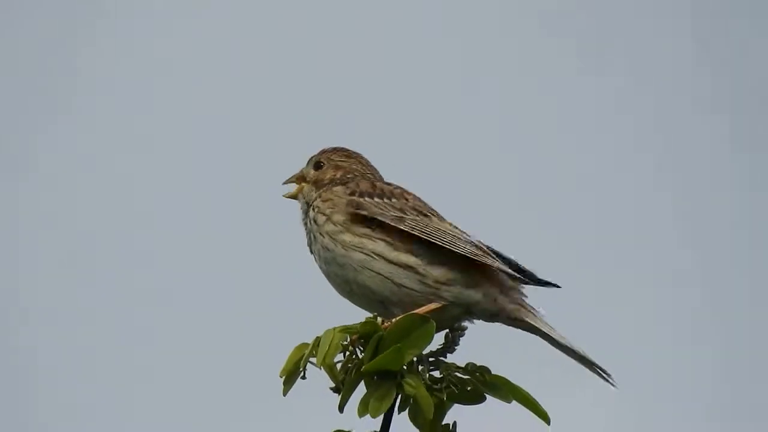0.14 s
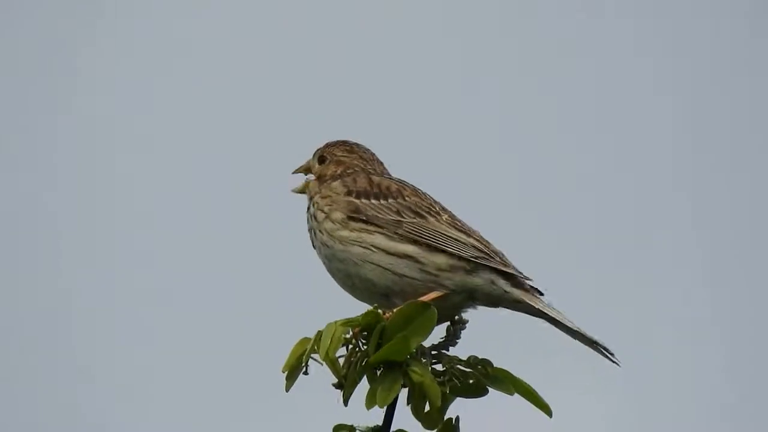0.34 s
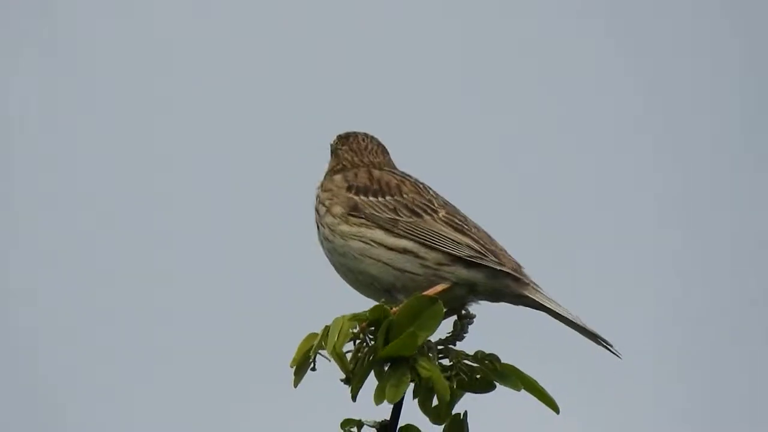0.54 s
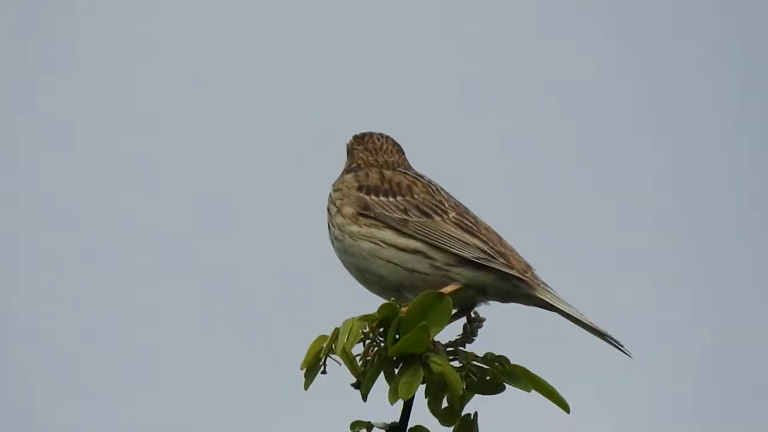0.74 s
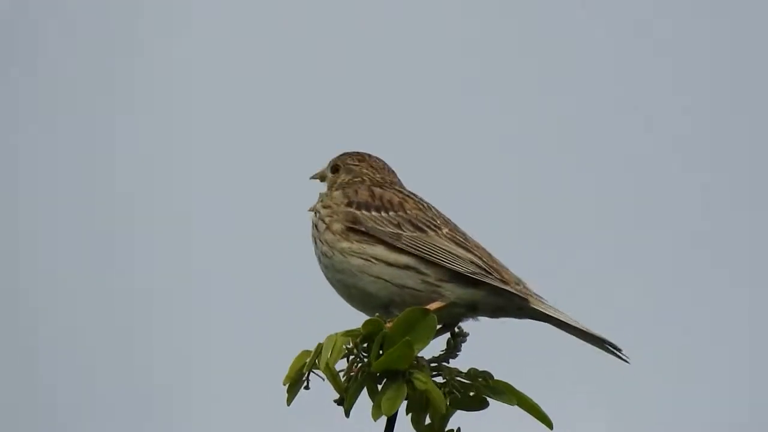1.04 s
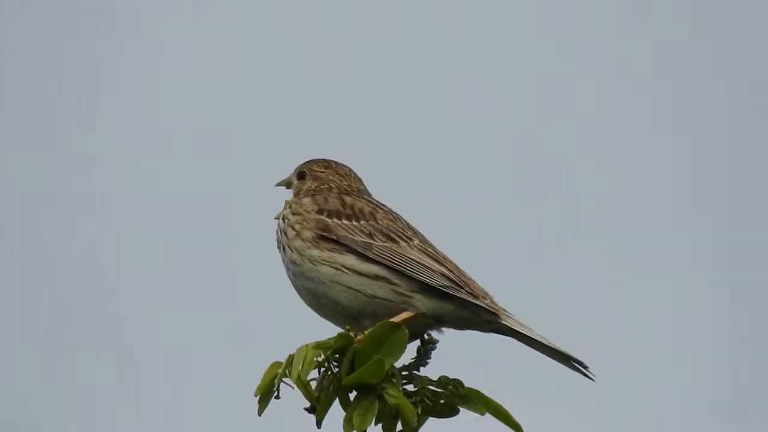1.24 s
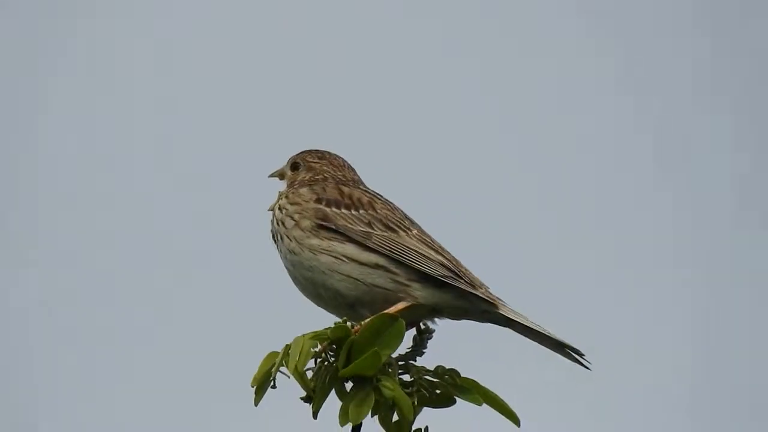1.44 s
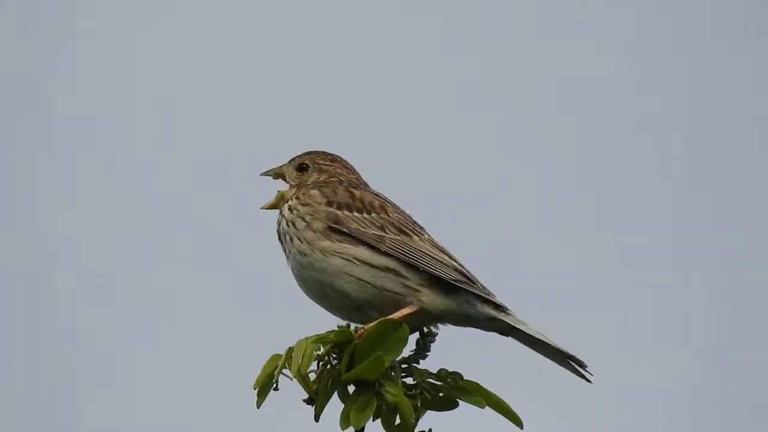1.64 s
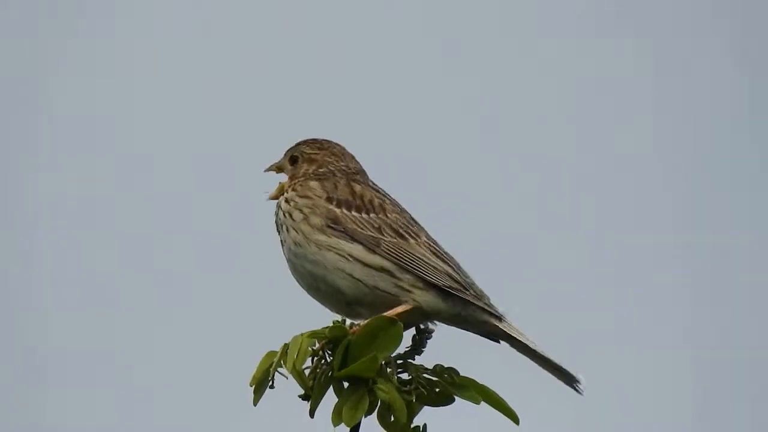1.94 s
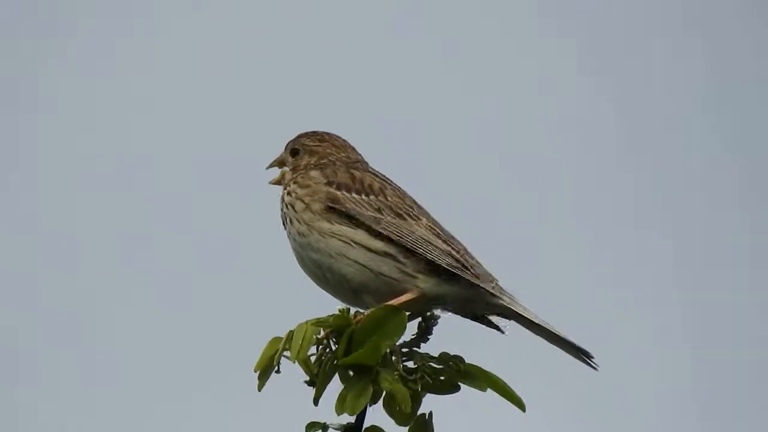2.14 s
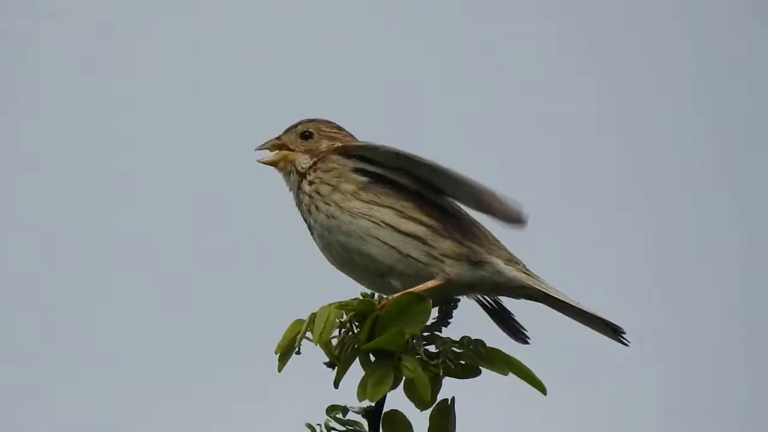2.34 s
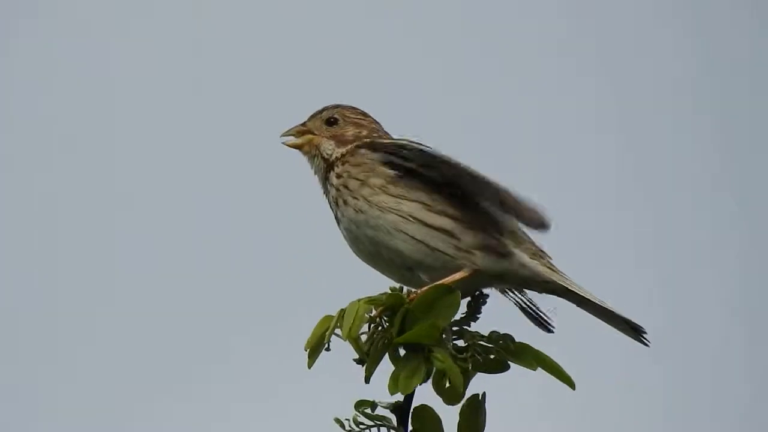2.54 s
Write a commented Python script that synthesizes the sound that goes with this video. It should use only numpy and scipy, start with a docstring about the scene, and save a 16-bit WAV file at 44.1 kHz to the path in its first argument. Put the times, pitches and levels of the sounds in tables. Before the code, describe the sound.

A small songbird's quickening ticks tumble into a high jangle over soft outdoor hush.

```python
"""A small bird sings from a treetop: quickening ticks, a jangle of falling whistles, a slowing rattle.
Each note is a short gliding near-sine. Two microphone ports hear the singer with a balance that
changes with pitch, and leaves and ground throw a short echo back. Other birds twitter far away
over a faint outdoor wash, a few soft low tones and a little wind rumble on the microphone."""
import sys
import numpy as np
from scipy import signal
from scipy.fft import rfft, irfft
from scipy.io import wavfile
from scipy.ndimage import uniform_filter1d

SR = 44100
rng = np.random.default_rng(int(sys.argv[2]) if len(sys.argv) > 2 else 0)


def store_wav(level_fs):
    """Save 16-bit WAV to argv[1]."""
    pcm = np.round(np.clip(np.atleast_2d(level_fs), -1, 1) * 32767)
    wavfile.write(sys.argv[1], SR, pcm.T.astype(np.int16))


N = 119070

# Opening ticks, before their delay and trim: cue_s, level_db, tail_hz, tail_relative_db, pip_relative_db
OPENING_TICKS = [(0.2214, -13, 4667, -7.5, -40), (0.4294, -11.5, 4710, -5.5, -35.5),
                 (0.6043, -9.5, 4747, -7, -9), (0.7428, -11.5, 4735, -4, -7.5),
                 (0.8514, -10.5, 4905, -5, -10.5), (0.9376, -9.5, 4980, -5.5, -6),
                 (1.0118, -10, 4850, -6, -4.5), (1.077, -8.5, 4830, -10, -8)]
# Low fluttering notes inside the jangle: start_s, length_s, pitch_hz, level_db
FLUTTER_NOTES = [(1.187, 0.036, 4540, -33), (1.222, 0.023, 4320, -30), (1.247, 0.065, 4836, -27.5),
                 (1.462, .008, 4190, -41), (1.48, .01, 4190, -30.5)]
# Whistles of the jangle and rattle: peak_s, level_db, rise_s, fall_s, start_hz, peak_hz, end_hz
SONG_WHISTLES = [(0.033, -38.5, 0.006, 0.0075, 7180, 6800, 6100),
                 (1.11, -27, 0.0033, 0.0013, 5450, 5230, 5050),
                 (1.12, -15.5, 0.006, 0.004, 5730, 5770, 4970),
                 (1.1312, -23, 0.0077, 0.0108, 7850, 6980, 6850),
                 (1.1436, -31.5, 0.0048, 0.0016, 5910, 5440, 4900),
                 (1.157, -25.5, 0.0033, 0.0027, 5640, 5300, 5110.0),
                 (1.165, -32, 0.022, 0.004, 7250, 7120, 7300),
                 (1.167, -25, 0.0044, 0.0032, 5530, 5060, 4910.0),
                 (1.1781, -19, 0.0027, 0.0017, 7260, 5350, 4740),
                 (1.1903, -24, 0.003, 0.002, 7280, 6170, 4810.0),
                 (1.2015, -21, 0.0067, 0.0016, 7320, 7150, 6740),
                 (1.2048, -15.5, 0.0033, 0.0011, 6890, 5400, 4960),
                 (1.2106, -17.5, 0.0072, 0.0018, 7380, 6770, 6700),
                 (1.214, -10, 0.0033, 0.0024, 6820, 5800, 4960),
                 (1.23, -21.5, 0.0066, 0.0027, 5010.0, 5700, 5660),
                 (1.2368, -23, 0.0033, 0.002, 5090, 5440, 5530),
                 (1.2466, -11, 0.0049, 0.0045, 7650, 5960, 5020),
                 (1.2966, -27.5, 0.014, 0.0045, 8040, 7100, 7200),
                 (1.3053, -11, 0.0049, 0.0016, 5090, 5740, 5900),
                 (1.3061, -15, 0.0044, 0.0045, 6820, 6830, 7030),
                 (1.3151, -30, 0.0036, 0.0054, 7010, 6800, 7070),
                 (1.3158, -35.5, 0.0033, 0.0031, 5320, 5540, 5410),
                 (1.3214, -21.5, 0.0036, 0.0034, 6090, 5470, 5130),
                 (1.3273, -13, 0.0027, 0.0023, 6400, 5610, 4960),
                 (1.3326, -24, 0.0019, 0.0016, 7400, 6340, 5400),
                 (1.3372, -13.5, 0.0083, 0.0067, 7125, 5850, 5000),
                 (1.3545, -15.5, 0.0099, 0.0036, 5700, 5600, 5130),
                 (1.3688, -26, 0.0055, 0.0032, 8210, 7360, 7080),
                 (1.3719, -11.5, 0.0023, 0.0022, 7100, 6330, 5040),
                 (1.4259, -11.2, 0.0074, 0.003, 6270, 5820, 5140),
                 (1.4353, -29, 0.0033, 0.0022, 6320, 5830, 5160),
                 (1.4456, -23, 0.012, 0.0039, 5520, 5700, 5230),
                 (1.4466, -26.5, 0.003, 0.0018, 6530, 7060, 7930),
                 (1.4544, -26.5, 0.003, 0.0023, 6810.0, 6850, 7650),
                 (1.4563, -16.5, 0.0033, 0.0029, 5940, 5560, 5380),
                 (1.4673, -23, 0.0055, 0.0036, 5350, 5180, 5110.0),
                 (1.4766, -15.5, 0.01, 0.0043, 7610.0, 5820, 5100),
                 (1.4841, -33.5, 0.0024, 0.0016, 7720, 7630, 7900),
                 (1.4928, -12.5, 0.0064, 0.004, 6650, 5780, 4980),
                 (1.4997, -23, 0.0033, 0.0033, 7200, 6810.0, 6460),
                 (1.5077, -12, 0.0072, 0.0045, 6025, 5830, 5140),
                 (1.5177, -25.5, 0.0025, 0.0037, 7400, 6870, 6660),
                 (1.5264, -10.5, 0.0065, 0.0031, 5910.0, 5840, 4900),
                 (1.5335, -22, 0.0033, 0.0024, 7700, 6980, 6530),
                 (1.5422, -10.5, 0.0078, 0.0045, 6300, 5825, 4930),
                 (1.551, -29.5, 0.0018, 0.0031, 7710.0, 7420, 6810.0),
                 (1.5636, -14.5, 0.0121, 0.0049, 5910.0, 5760, 5130),
                 (1.57, -22.5, 0.0066, 0.0042, 7880, 6850, 6510.0),
                 (1.5829, -11, 0.0096, 0.0025, 5700, 5900, 4820),
                 (1.5915, -19, 0.0038, 0.0074, 7820, 6790, 6840),
                 (1.6072, -9.5, 0.011, 0.0043, 5750, 5645, 5490),
                 (1.62, -28, 0.0055, 0.0036, 5590, 5530, 5510.0),
                 (1.6239, -31.5, 0.019, 0.0045, 7110.0, 7020, 7070),
                 (1.6506, -11.5, 0.0083, 0.0048, 6010, 5800, 5400),
                 (1.663, -33, 0.0055, 0.0028, 5800, 5590, 5500),
                 (1.681, -18, 0.0088, 0.0045, 7670, 6790, 7100),
                 (1.7128, -10, 0.011, 0.0045, 7750, 6570, 5880),
                 (1.7441, -10, 0.011, 0.0081, 7730, 6540, 5870),
                 (1.7781, -11, 0.011, 0.012, 8100, 6600.0, 5700),
                 (1.815, -11.5, 0.016, 0.0072, 6150, 5630.0, 5840),
                 (1.8379, -19, 0.019, 0.0086, 4800, 5146, 5230),
                 (1.8808, -9.5, 0.0086, 0.0045, 7900, 6510, 5800),
                 (1.9232, -9.5, 0.0074, 0.0045, 7790, 6560, 5810.0),
                 (1.9668, -11, 0.013, 0.0085, 7910.0, 6370, 5950),
                 (2.0124, -11, 0.0099, 0.0042, 7740, 6510, 6090),
                 (2.0623, -15, 0.0063, 0.0034, 7680, 6490, 6150),
                 (2.1148, -19, 0.0064, 0.0054, 7520, 6540, 6230),
                 (2.1753, -19, 0.006, 0.0081, 5870, 5577, 5610.0),
                 (2.264, -19.5, 0.0042, 0.0054, 7290, 6540, 6190),
                 (2.3171, -18, 0.0066, 0.0028, 7720, 6680, 6430),
                 (2.3725, -21.5, 0.0022, 0.0018, 6650, 6270, 5480),
                 (2.3746, -22.5, 0.0078, 0.0028, 7740, 6820, 6900),
                 (2.4361, -23, 0.011, 0.0035, 8240, 6480, 5120),
                 (2.4387, -18.5, 0.0027, 0.0033, 7030, 6700, 6490),
                 (2.4927, -19, 0.0055, 0.0017, 7850, 6390, 5380)]
# The singer's balance between the ports: frequency_hz, left_minus_right_db
PORT_BALANCE = [(4300, 3), (5200, 4.5), (5700, 4), (6200, -0.5), (6650, -3), (7200, -10), (7600, 2),
                (8000, 3), (8800, -1.5)]
# The singer's phase between the ports: frequency_hz, left_minus_right_rad
PORT_PHASE_SHIFT = [(4300, -0.51), (5200, -0.75), (5800, -.6), (6700, -0.84), (8000, -0.91)]
# Reflections off nearby leaves: delay_s, left_db, right_db
LEAF_BOUNCES = [(.0024, -12.5, -13), (.0062, -17.5, -23.5), (0.0105, -14.5, -20.5)]
# Calls of distant birds: peak_s, level_db, rise_s, fall_s, start_hz, peak_hz, end_hz
FAR_WHISTLES = [(0.03, -51, 0.0198, 0.0132, 3610.0, 4210.0, 4400),
                (0.076, -54, 0.022, 0.0094, 3710.0, 4200, 4310.0),
                (0.1112, -54.4, 0.0154, 0.0079, 3700, 4030, 4300),
                (0.124, -52, 0.0088, 0.011, 4650, 4440, 4310.0),
                (0.1642, -50.5, 0.0088, 0.016, 4590, 4630, 4040),
                (0.2136, -45, 0.0074, 0.04, 4630, 4530, 4190),
                (0.0789, -57, 0.033, 0.016, 3410.0, 3520.0, 3530),
                (0.1998, -58.5, 0.04, 0.034, 3110.0, 3050.0, 3110.0),
                (0.4077, -46.5, 0.077, 0.0308, 4600, 4850, 4740),
                (0.529, -56, 0.041, 0.086, 2610.0, 2690, 2820),
                (0.7006, -46.5, 0.005, 0.014, 4570, 4720, 4160),
                (0.8645, -31.5, 0.017, 0.02, 4810.0, 4280, 4490),
                (0.9794, -48.5, 0.021, 0.02, 3910.0, 3990, 3770),
                (1.1021, -39.5, 0.044, 0.035, 3880, 3724, 3640),
                (1.103, -65.5, 0.026, 0.04, 3210.0, 2740.0, 2200),
                (1.1575, -47.5, 0.0165, 0.04, 3870, 3560, 3280),
                (1.2526, -56, 0.025, 0.027, 3360, 3340, 3340),
                (1.351, -43.5, 0.03, 0.022, 3810.0, 3667, 3560),
                (1.3643, -44.5, 0.023, 0.019, 3310.0, 3347, 3200),
                (1.4617, -35, 0.0275, 0.033, 4046, 4320, 4190),
                (1.5603, -39, 0.013, 0.011, 3550, 3514, 3120),
                (1.6035, -43, 0.011, 0.0083, 3510.0, 3646, 3390),
                (1.66, -40.5, 0.011, 0.012, 4610.0, 4450, 4070),
                (1.6951, -44, 0.023, 0.014, 3210.0, 3523, 3110.0),
                (1.7895, -47, 0.012, 0.016, 4610.0, 4540, 4260),
                (1.953, -38.5, 0.023, 0.0069, 4700, 4670, 4870),
                (1.9681, -40, 0.011, 0.0088, 5210.0, 5260, 5230),
                (1.982, -49, 0.0089, 0.0074, 4530, 4660, 4210.0),
                (2.006, -56.5, 0.012, 0.022, 3710.0, 3760.0, 3460),
                (2.027, -51, 0.013, 0.0132, 4740, 4740, 4310.0),
                (2.0614, -47, 0.014, 0.015, 4830, 4550.0, 4250),
                (2.1148, -45.5, 0.076, 0.0071, 3130, 3520, 3470),
                (2.109, -48, 0.0132, 0.01, 4620, 4500, 4300), (2.135, -58, 0.0165, 0.015, 2960, 3000, 3030),
                (2.148, -45.5, 0.0079, 0.013, 4840, 4600, 4110.0),
                (2.1622, -55, 0.022, 0.018, 3910.0, 3710.0, 3500),
                (2.1938, -44.5, 0.0132, 0.012, 4750, 4570, 4260),
                (2.224, -50.5, 0.034, 0.036, 3410.0, 3130.0, 2720),
                (2.3014, -53.5, 0.0132, 0.0198, 4810.0, 4810.0, 4540),
                (2.3783, -53, 0.011, 0.0063, 4540, 4450.0, 4280),
                (2.4144, -46.5, 0.0076, 0.017, 4830, 4520, 4260),
                (2.471, -46.5, 0.011, 0.0067, 4710.0, 4400, 4210.0),
                (2.5104, -45.5, 0.014, 0.008, 4590, 4540, 4050),
                (2.5079, -65, 0.045, 0.022, 2610.0, 2720.0, 2700),
                (2.5488, -44, 0.014, 0.018, 4310.0, 4660.0, 4240),
                (2.5678, -57, 0.041, 0.046, 2310.0, 2344, 2100),
                (2.5982, -44.5, 0.015, 0.013, 4210.0, 4680, 4210.0),
                (2.628, -62, 0.0055, 0.004, 4210.0, 4540, 4670),
                (2.6486, -52, 0.007, 0.0055, 4170, 4470, 4560),
                (2.6584, -59.3, 0.0198, 0.016, 2810.0, 2740.0, 2660),
                (2.671, -48, 0.0055, 0.004, 4200, 4450, 4530),
                (2.6925, -46.5, 0.0061, 0.0048, 4250, 4540, 4560)]
# Faint low tones from far off: peak_s, level_db, rise_s, fall_s, start_hz, peak_hz, end_hz
FAR_LOW_TONES = [(.335, -53.5, 0.035, 0.038, 900, 925, 1100), (1.82, -54.5, .05, 0.034, 560, 500, 495),
                 (0.62, -57, .04, .03, 500, 555, 570)]
# Tone colour of the outdoor wash: frequency_hz, relative_db
WASH_SPECTRUM = [(20, -31), (45, -14), (85, -18), (120, -1.5), (170, 2.5), (357, -4), (635, -3.5),
                 (1050, -3.5), (1500, -6.5), (2400, -15), (3230, -10), (4480, -7), (5400, -17),
                 (7970, -18.5), (9500, -25.5), (12500, -28), (14800, -31.5), (15800, -37)]
# How alike the wash is on both sides: frequency_hz, correlation
WASH_LIKENESS = [(60, 0.34), (160, 0.53), (410, 0.54), (1090, 0.72), (2860, 0.41), (7520, 0.21)]
# Which way the wash leans: frequency_hz, left_minus_right_db
WASH_PAN = [(60, 0.63), (160, 0.5), (410, 1.0), (1090, 0.0), (2860, 3.9), (7520, 2.1)]
# Fader moves of the wind rumble, before its trim: time_s, level_db
WIND_GUSTS = [(0.0, -68), (0.01, -78), (0.71, -65), (0.77, -77), (0.8, -56), (1.35, -78), (1.38, -36),
              (2.15, -70.5), (2.63, -65), (2.7, -62)]


def singer():
    """The near bird's song: ticks, fluttering low notes, whistles and a short buzz."""
    song = np.zeros(N)
    add_ticks(song)
    for row in FLUTTER_NOTES:
        add(song, *flutter_note(*row))
    for row in SONG_WHISTLES:
        add(song, *whistle(*row))
    add_buzz(song)
    return song


def add_ticks(song, delay_s=0.0029, trim_db=-6):
    """Each tick is a fast falling chirp with a tiny lead-in pip and a low fluttering tail."""
    pip_s, pip_hz = 0.0017, 5950
    for cue_s, level_db, tail_hz, tail_db, pip_db in OPENING_TICKS:
        peak_s, db = cue_s + delay_s, level_db + trim_db
        add(song, *whistle(peak_s, db, rise_s=0.0028, fall_s=0.0039, start_hz=6500, peak_hz=5860,
                           end_hz=5360, overtone_db=-70, roundness=3))
        add(song, *whistle(peak_s - 0.0068, db + pip_db, pip_s, pip_s, pip_hz, pip_hz, pip_hz))
        add(song, *flutter_note(peak_s - 0.0041, length_s=0.034, pitch_hz=tail_hz, level_db=db + tail_db))


def whistle(peak_s, level_db, rise_s, fall_s, start_hz, peak_hz, end_hz,
            overtone_db=-50, wobble_hz=55, roundness=1.3, rasp=0.15):
    """A near-sine that swells, glides through three pitches and fades. Returns start time and sound."""
    t = np.arange(-rise_s * 1.2, fall_s * 1.2, 1 / SR)
    glide_hz = uniform_filter1d(np.interp(t, [-rise_s, 0, fall_s], [start_hz, peak_hz, end_hz]), size=60)
    phase = 2 * np.pi * np.cumsum(glide_hz + wobble_hz * drift(len(t), size=40)) / SR
    from_peak = np.where(t < 0, t / t[0], t / t[-1]).clip(0, 1)
    edge_db = np.where(t < 0, -25, -14)  # swells from 25 dB down, fades by 14 dB
    taper = np.cos(np.pi / 2 * from_peak ** 4)  # closes both ends without a click
    envelope = amp(edge_db * from_peak ** roundness) * taper
    roughness = 1 + rasp * drift(len(t), size=45)
    overtone = amp(overtone_db) * (1 + 0.47 * drift(len(t), size=30)) * np.sin(2 * phase)
    return peak_s + t[0], np.sqrt(2) * amp(level_db) * envelope * roughness * (np.sin(phase) + overtone)


def flutter_note(start_s, length_s, pitch_hz, level_db, drop_hz=350, flutter_hz=230, depth=0.63):
    """A held note that drops into pitch and flutters unevenly. Returns start time and sound."""
    t = np.arange(0, length_s, 1 / SR)
    hz = pitch_hz + drop_hz * np.exp(-t / 0.0037) + 70 * drift(len(t), size=50)
    phase = 2 * np.pi * np.cumsum(hz) / SR
    tone = np.sin(phase) + amp(-33) * np.sin(2 * phase)
    cycles = rng.random() + np.cumsum(flutter_hz * (1 + 0.24 * drift(len(t), size=150))) / SR
    flutter = 1 + depth * np.cos(2 * np.pi * cycles)
    envelope = np.sin(np.pi * np.sin(np.pi / 2 * t / length_s))
    return start_s, np.sqrt(2) * amp(level_db) * envelope * flutter * tone


def add_buzz(song, start_s=1.3802, step_s=0.0023, start_db=-19.5, grow_db=0.55, offbeat_db=-6.5):
    """Fifteen falling chips, alternately strong and weak, blur into a swelling buzz."""
    for k, (late, loud, high) in enumerate(rng.standard_normal((15, 3))):
        peak_s = start_s + step_s * k + 0.0003 * late
        db = start_db + grow_db * k + offbeat_db * (k % 2) + 1.5 * loud
        add(song, *whistle(peak_s, db, rise_s=0.0018, fall_s=0.0018,
                           start_hz=6900, peak_hz=5820 + 200 * high, end_hz=4740))


def microphone_ports(sound):
    """Mono to stereo: the two ports hear each pitch with their own level and phase."""
    hz = np.fft.rfftfreq(N, 1 / SR)
    left = amp(curve(PORT_BALANCE, hz) / 2) * np.exp(0.5j * curve(PORT_PHASE_SHIFT, hz))
    right = 1 / left
    rms_gain = np.sqrt((abs(left) ** 2 + abs(right) ** 2) / 2)
    return irfft(rfft(sound) * np.array([left, right]) / rms_gain, N)


def leaf_bounces(sound):
    """The direct sound plus a few early reflections off leaves, different at each port."""
    taps = np.zeros((2, SR // 20))
    taps[:, 0] = 1
    for delay_s, left_db, right_db in LEAF_BOUNCES:
        taps[:, round(delay_s * SR)] = amp([left_db, right_db])
    return signal.fftconvolve(sound, taps, axes=1)[:, :N]


def echo(sound, t60_s, gap_s=0.0036, density=0.04, shared=0.45):
    """Scatter from leaves and ground: sparse random taps that die away, partly shared by both sides."""
    t = np.arange(SR // 2) / SR
    taps = rng.standard_normal((3, len(t))) * (rng.random((3, len(t))) < density)
    taps *= amp(-60 * t / t60_s) * (t > gap_s)
    taps = shared * taps[2] + (1 - shared) * taps[:2]
    taps /= np.linalg.norm(taps, axis=1, keepdims=True)
    return signal.fftconvolve(np.atleast_2d(sound), taps, axes=1)[:, :N]


def far_birds():
    """Thin whistles from further trees and a few low tones, over soft random chatter."""
    calls = np.zeros(N)
    for row in FAR_WHISTLES:
        add(calls, *whistle(*row, overtone_db=-60, wobble_hz=70, roundness=3, rasp=0.35))
    for row in FAR_LOW_TONES:
        add(calls, *whistle(*row, wobble_hz=13, roundness=3))
    for when, loud, long, high, glide in rng.random((130, 5)):
        db, ramp_s = -59 + 3.5 * (2 * loud - 1), 0.0069 + 0.014 * long
        hz, step_hz = 2600 + 2100 * high, 600 * (glide - 0.7)  # most of the chatter slides down
        add(calls, *whistle(when * N / SR, db, ramp_s, ramp_s, hz - step_hz, hz, hz + step_hz,
                            wobble_hz=70))
    return calls


def outdoor_wash(level_db=-49.5, patch_db=1.7):
    """A wide bed of distant noise, with soft patches drifting across time and pitch."""
    frames, hz = N // 256 + 5, np.fft.rfftfreq(1024, 1 / SR)
    left_re, left_im, apart_re, apart_im, patches = rng.standard_normal((frames, 513, 5)).T
    patches = evened(uniform_filter1d(uniform_filter1d(patches, size=6, axis=0), size=14, axis=1))
    likeness = np.clip(curve(WASH_LIKENESS, hz), -1, 1)[:, None]
    left = left_re + 1j * left_im
    right = likeness * left + np.sqrt(1 - likeness ** 2) * (apart_re + 1j * apart_im)
    pan = amp(curve(WASH_PAN, hz) / 2)[:, None]
    spectra = np.array([left * pan, right / pan])
    spectra *= amp(curve(WASH_SPECTRUM, hz)[:, None] + patch_db * patches)
    _, bed = signal.istft(spectra, nperseg=1024, noverlap=768)
    return amp(level_db) * evened(bed[:, :N])


def wind(band_hz=(40, 114), trim_db=-18):
    """Gusts rumble on the microphone, stronger on the right port."""
    band = signal.butter(2, band_hz, "band", fs=SR, output="sos")
    rumble = evened(signal.sosfilt(band, rng.standard_normal((2, N))))
    time_s, level_db = np.transpose(WIND_GUSTS)
    gusts = amp(np.interp(np.arange(N) / SR, time_s, level_db) + trim_db)
    return rumble * gusts * amp([[-3], [3]])


def amp(db):
    """Decibels to linear gain."""
    return 10 ** (np.asarray(db) / 20)


def evened(x):
    """Scale to an rms of 1."""
    return x / np.sqrt(np.mean(x ** 2) + 1e-20)


def curve(points, hz):
    """Join (frequency, value) points along a log frequency axis."""
    point_hz, value = np.transpose(points)
    return np.interp(np.log(hz + 1), np.log(point_hz + 1), value)


def add(mix, start_s, sound):
    """Lay a sound into the mix."""
    part = mix[max(round(start_s * SR), 0):][:len(sound)]
    part += sound[:len(part)]


def drift(length, size):
    """Looped random wander of rms 1, smoothed over `size` samples."""
    loop = evened(uniform_filter1d(uniform_filter1d(rng.standard_normal(2000), size), size))
    return loop[np.arange(length) % len(loop)]


def scene():
    """The singer up front with its echoes; far birds wetter and a little left; wash and wind beneath."""
    song, calls = singer(), far_birds()
    near = microphone_ports(song)
    far = calls * amp([[1.5], [-1.5]]) + amp(-5) * echo(calls, t60_s=0.3)
    short_echo = amp(-12) * echo(near, t60_s=0.17)
    late_echo = amp(-13.5) * echo(song, t60_s=0.35)
    return leaf_bounces(near) + short_echo + late_echo + far + outdoor_wash() + wind()


def record(dry):
    """The recorder's band limit: a steep cut of the highest treble."""
    lowpass = signal.firwin(511, cutoff=15850, window=("kaiser", 9), fs=SR)
    return signal.oaconvolve(dry, lowpass[None], "same")


dry = scene()
out = record(dry)
store_wav(out)
```